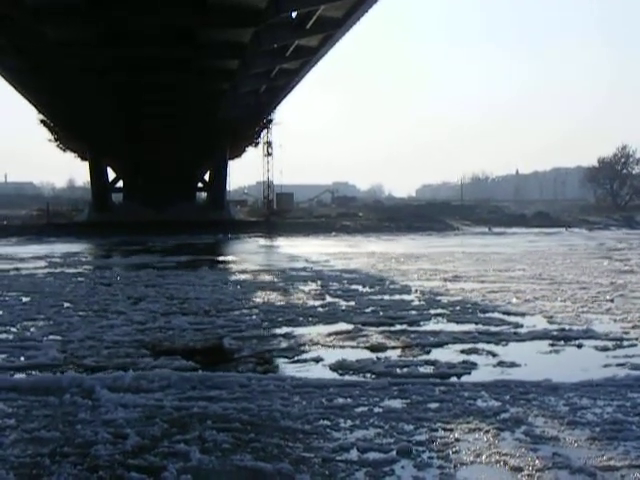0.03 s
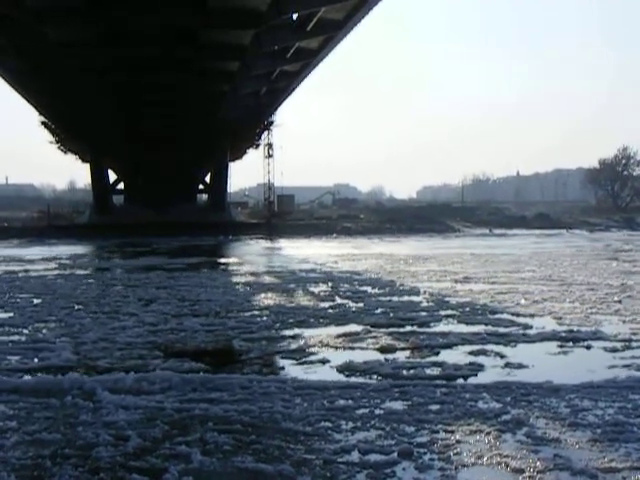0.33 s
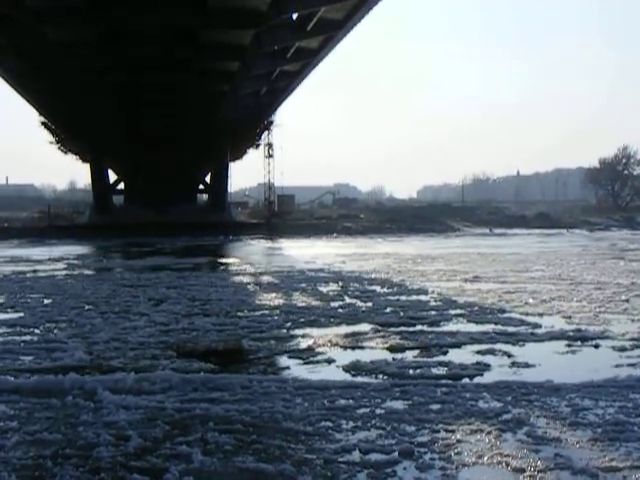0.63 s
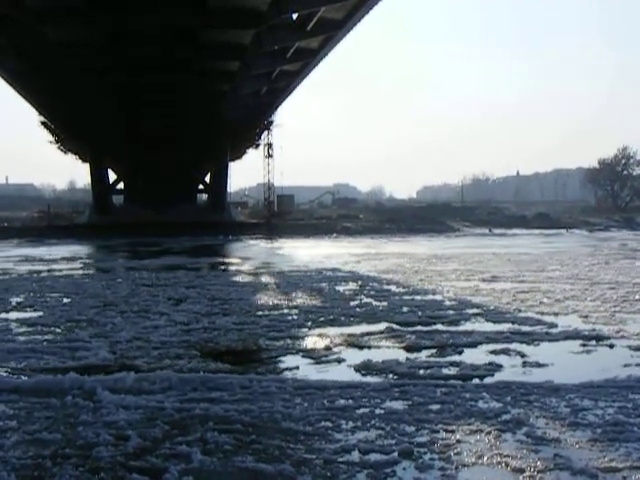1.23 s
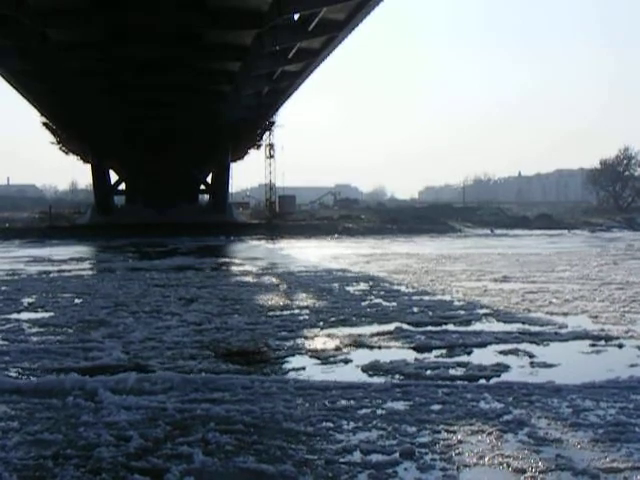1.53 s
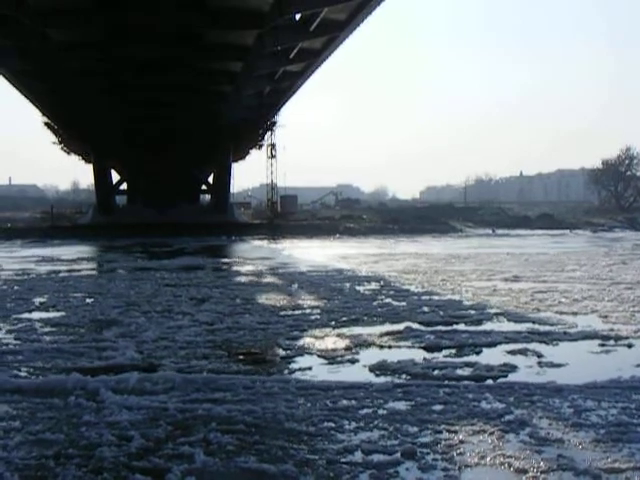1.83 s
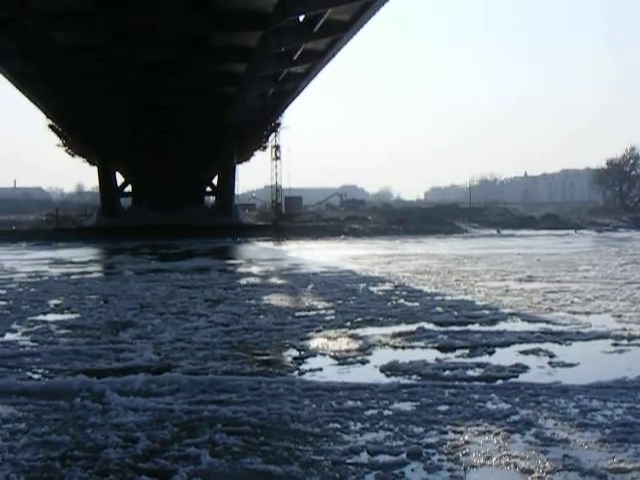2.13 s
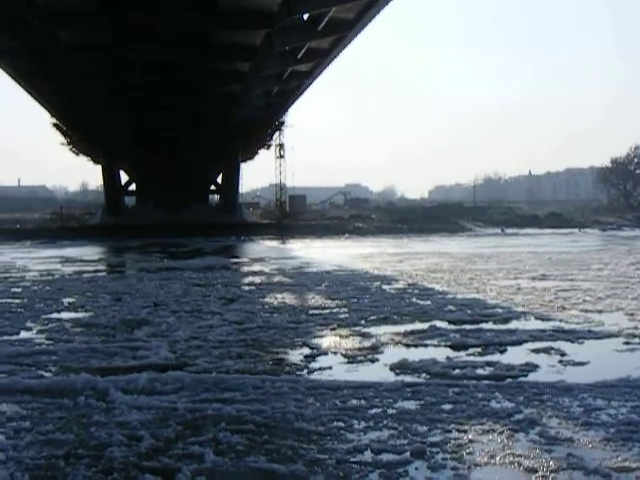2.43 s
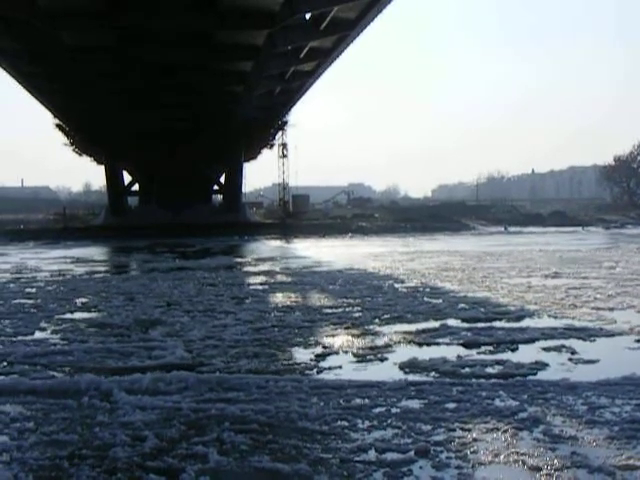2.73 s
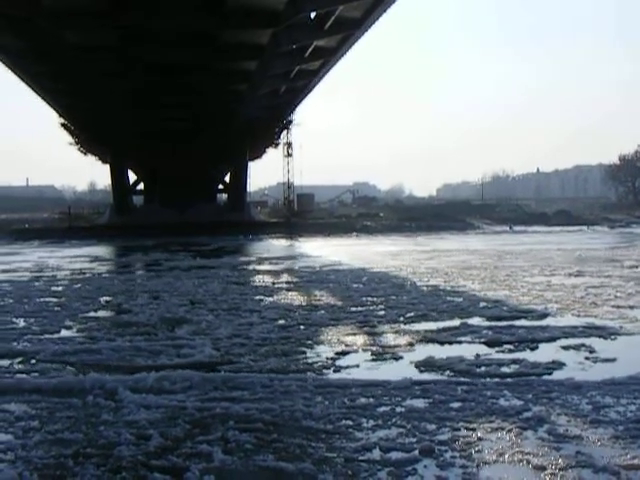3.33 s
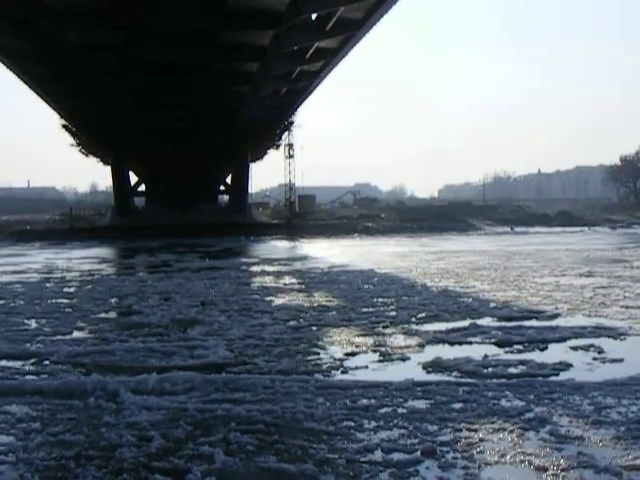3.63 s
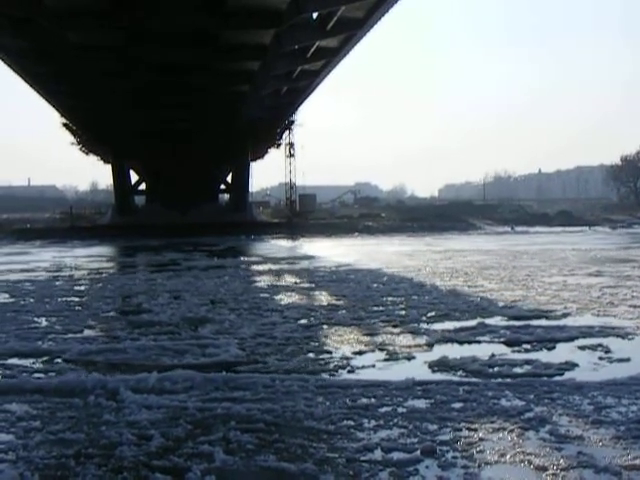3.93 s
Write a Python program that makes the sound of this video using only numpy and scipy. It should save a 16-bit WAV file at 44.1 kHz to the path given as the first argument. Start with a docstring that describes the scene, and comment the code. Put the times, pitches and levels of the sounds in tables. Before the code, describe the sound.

A fine, rustling hiss of slushy ice floes carries on above flowing river water. A few short clacks and hollow grinds come first, followed by low gusts on the microphone, a brief crackly scrape and two quick clacks.

```python
"""Drift ice on a river, heard from a bridge as it passes below. Slushy rims rub with a fine, dense
hiss of breaking crystals over the wash of the water. Now and then floes grind with a hollow rumble
or knock together, and one rim scrapes along another. Gusts buffet the microphone with low, dull puffs."""
import sys
import numpy as np
from scipy import signal
from scipy.fft import rfft, irfft
from scipy.io import wavfile
from scipy.ndimage import uniform_filter1d

SR = 44100
rng = np.random.default_rng(int(sys.argv[2]) if len(sys.argv) > 2 else 0)


def generate_wav(signal):
    """Clip the signal to [-1, 1] and save it as 16-bit WAV at the path in sys.argv[1]."""
    frames = np.transpose(np.atleast_2d(signal))
    scaled = np.clip(frames, -1, 1) * 32767
    pcm = np.round(scaled).astype(np.int16)
    wavfile.write(sys.argv[1], SR, pcm)


N = 176400


def undb(db):
    """Decibels to gain."""
    return 10 ** (np.asarray(db) / 20)


def unit(x):
    """Scale to an rms of 1."""
    return x / np.sqrt(np.mean(x ** 2))


def curve(rows):
    """Join (t/s, value) rows by straight lines."""
    return np.interp(np.arange(N) / SR, *np.array(rows).T)


def colour(x, points):
    """Filter x by a curve of (f/Hz, level/dB) points, silent beyond its ends; rms 1."""
    hz, db = np.array(points).T
    f = np.maximum(np.arange(N // 2 + 1) * SR / N, 1)
    gain_db = np.interp(np.log(f), np.log(hz), db, left=-np.inf, right=-np.inf)
    return unit(irfft(rfft(x) * undb(gain_db), N))


def resonate(x, hz, width_hz):
    """One resonance, at rms 1."""
    return unit(signal.lfilter(*signal.iirpeak(hz, hz / width_hz, fs=SR), x))


def lowpass(x, hz):
    """Steep treble cut."""
    return signal.sosfilt(signal.ellip(10, .2, 80, hz, fs=SR, output="sos"), x)


def walk(rate):
    """Smooth wander through `rate` random values a second, at rms 1."""
    hold = int(SR / rate)
    steps = np.repeat(rng.standard_normal(N // hold + 1), hold)
    return unit(uniform_filter1d(uniform_filter1d(steps, hold), hold)[:N])


def restless(x, rate, flicker_db):
    """Let each half-octave band from 100 to 6400 Hz swell and fade on its own."""
    f = np.maximum(np.arange(N // 2 + 1) * SR / N, 100)
    half_octaves = 2 * np.log2(f / 100)
    spectrum = rfft(x)
    bands = (irfft(spectrum * np.maximum(1 - abs(half_octaves - k), 0), N) for k in range(13))
    return sum(band * undb(flicker_db * walk(rate)) for band in bands)


def envelope(start, length, attack, release):
    """Linear attack, hold and exponential release; times in s."""
    age = np.arange(N) / SR - start
    return np.clip(age / attack, 0, 1) * np.exp(-np.maximum(age - length, 0) / release)


def burst(x, shape):
    """Play x under an envelope, near rms 1 while it holds."""
    return x * shape / np.sqrt(np.sum((x * shape) ** 2) / np.sum(shape ** 2))


def fractures(per_s, spread_db):
    """Tiny cracks click at random; a spread makes a few stand out."""
    cracked = rng.random(N) < per_s / SR
    size = np.minimum(rng.exponential(size=N), 6)
    sign = rng.choice([-1, 1], N)
    return unit(cracked * sign * undb(spread_db * size))


def crystals():
    """Countless ice crystals break: the far ones merge into noise, the near ones rustle."""
    far = rng.standard_normal(N)
    near = undb(-6) * fractures(per_s=2500, spread_db=4)
    return far + near


def rubbing():
    """Slushy rims rub all over the river, shedding crystals in a flickering hiss."""
    # swell of the hiss: t/s, level/dB before the gain
    swell = [(0, -47.5), (.35, -44.5), (.6, -45.5), (1.1, -45), (1.5, -45.5), (2.05, -46), (2.3, -48),
             (2.6, -45), (2.95, -44.5), (3.27, -43.5), (3.45, -46), (3.7, -46.5), (4, -46)]
    # spectrum of the hiss: f/Hz, level/dB
    spectrum = [(400, -34), (1000, -6), (1800, 1), (2600, -0.5), (3300, -2.5), (4000, -8), (5000, -14.5),
                (5600, -21.5), (6200, -41)]
    gain_db = 1.43
    hiss = colour(restless(crystals(), rate=10, flicker_db=0.97), spectrum)
    return hiss * undb(curve(swell) + gain_db)


def wash():
    """Moving water and distant ice blend into a broad, dull bed."""
    # swell of the river: t/s, level/dB before the gain
    swell = [(0, -42), (.22, -44), (.38, -42.5), (.52, -44), (.85, -42), (1.08, -42), (1.4, -44.5),
             (1.85, -45), (2.3, -43), (2.88, -43.5), (3.25, -43.5), (3.55, -45.5), (4, -46)]
    # spectrum of the river: f/Hz, level/dB
    spectrum = [(15, -19), (28, -15.5), (45, -1.5), (65, 5), (100, -2.5), (170, -3.5), (300, -4.5),
                (550, -6), (800, -9), (1120, -10.5), (1500, -15.5), (3000, -26), (6000, -51.5)]
    gain_db = 8
    water = colour(restless(rng.standard_normal(N), rate=16, flicker_db=1.0), spectrum)
    return water * undb(curve(swell) + gain_db)


def grinding():
    """Floes stick and slip: loosely regular jerks ring the plate while the contact crumbles."""
    # floes in contact: start t/s, length/s, level/dB, floe pitch f/Hz
    grinds = [(0.0, 0.042, -26.5, 319), (0.073, .04, -34.5, 221.6), (0.924, 0.1, -32.5, 240.5),
              (1.092, 0.03, -31.5, 335), (1.172, 0.044, -38.5, 246)]
    # spectrum of the crumbling contact: f/Hz, level/dB
    spectrum = [(100, -14), (180, -5), (250, 0), (400, -4.5), (560, -3), (800, -19.5), (1300, -23.5),
                (3000, -34)]
    slip_jitter, ring_db = .06, -2
    out = np.zeros(N)
    for start, length, db, hz in grinds:
        cycles = np.cumsum(hz * (1 + slip_jitter * walk(150))) / SR
        slips = np.diff(np.floor(cycles), prepend=0) * undb(2.6 * walk(120))  # one uneven jerk a cycle
        crumble = colour(fractures(per_s=900, spread_db=0), spectrum)
        ring = undb(ring_db) * resonate(slips, hz, width_hz=33)
        out += undb(db) * burst(crumble + ring, envelope(start, length, attack=.01, release=0.043))
    return out


def knocks():
    """Short, damped clacks of floe on floe; a thin edge may clink along."""
    # collisions: t/s, level/dB, pitch ratio, edge trim/dB
    hits = [(.1747, -18.5, 0.98, -23), (.4452, -24.5, 0.85, -4), (.641, -30, 0.86, -13),
            (3.641, -26.5, .76, -17), (3.668, -21.5, 0.71, -24.5)]
    # modes of a floe: f/Hz at ratio 1, relative level/dB, t60/s
    floe_modes = [(684, 0, 0.033), (811, -2, 0.028), (1106, -15, 0.04), (1420, -20, 0.04)]
    out = np.zeros(N)
    for start, db, ratio, edge_db in hits:
        age = np.maximum(np.arange(N) / SR - start, 0)
        edge_mode = (4110, edge_db - 6, .05)
        for hz, mode_db, t60 in [*floe_modes, edge_mode]:
            decay = envelope(start, 0, attack=0.00066, release=t60 / np.log(1000))
            out += undb(db + mode_db) * np.sin(2 * np.pi * hz * ratio * age) * decay
    return out


def wind():
    """Gusts rumble and flutter right at the microphone; each eddy is a pressure dip with a raised rim."""
    # spectrum of the buffeting: f/Hz, level/dB
    spectrum = [(15, -16.5), (35, -0.5), (70, -1), (130, 2.5), (210, -3.5), (320, -14), (500, -19),
                (1000, -44.5)]
    # gusts: start t/s, length/s, level/dB
    gusts = [(0.571, 0.11, -33.5), (0.9, 0.051, -33.5), (2.178, 0.03, -29.5), (2.282, 0.14, -34),
             (2.401, 0.098, -25), (2.963, 0.066, -27.5), (3.58, 0.14, -29), (3.724, 0.25, -32.5)]
    # single eddies that hit the microphone: t/s, dip level/dB, half width/s
    eddies = [(0.5818, -18, 0.0024), (.658, -22, .0028), (.672, -26, .002), (2.191, -18, 0.0026),
              (2.2128, -23, 0.0048), (2.3325, -20.5, 0.0028), (2.4164, -5, 0.00084), (2.432, -13, 0.0015),
              (2.4403, -16, 0.0019), (2.4756, -14.5, 0.00078), (2.4948, -6, 0.0012), (2.509, -16, 0.0011),
              (2.974, -17.5, 0.0018), (2.9858, -23, .0018), (2.998, -9.5, 0.0009), (3.0271, -12, .0016),
              (3.587, -13, 0.0025), (3.6716, -11, 0.0016), (3.935, -19.5, 0.0027)]
    port_hz, port_db, eddy_lean = 106, -6.5, 0.13
    flutter = resonate(colour(rng.standard_normal(N), spectrum), port_hz, width_hz=120)
    rumble = unit(colour(rng.standard_normal(N), spectrum) + undb(port_db) * flutter)
    out = np.zeros(N)
    for start, length, db in gusts:
        out += undb(db) * burst(rumble, envelope(start, length, attack=0.0081, release=0.018))
    for when, db, width in eddies:
        u = (np.arange(N) / SR - when) / width
        out += undb(db) * (u ** 2 - eddy_lean * u - 1) * np.exp(-u ** 2 / 2)
    return out


def tick(at_s, db):
    """One faint, thin tick."""
    return undb(db) * (np.arange(N) == int(at_s * SR))


def scrape():
    """One rim slides along another: the crackle of crystals, narrower in colour than the hiss."""
    # swell of the slide: t/s, level/dB
    swell = [(2.5, -63), (2.7, -50), (2.8, -45), (2.94, -39.5), (3.07, -47.5), (3.16, -51), (3.25, -46),
             (3.43, -62)]
    # spectrum of the slide: f/Hz, level/dB
    spectrum = [(700, -20), (1400, -7), (2000, -1.5), (2600, -1), (3400, -3.5), (4200, -13.5),
                (5500, -28.5)]
    return colour(crystals(), spectrum) * undb(curve(swell))


def scene():
    """Ice, water and wind at one microphone on the bridge."""
    return (rubbing() + wash() + grinding() + knocks() + wind() + scrape())[None]


def record(dry):
    """A small camera's microphone passes a narrow band and sits slightly off zero; a tick lies on top."""
    dc_offset = -.016
    narrow = lowpass(dry, hz=5850)
    return lowpass(narrow + tick(at_s=1.4233, db=-28), hz=16000) + dc_offset


dry = scene()
out = record(dry)
generate_wav(out)
```